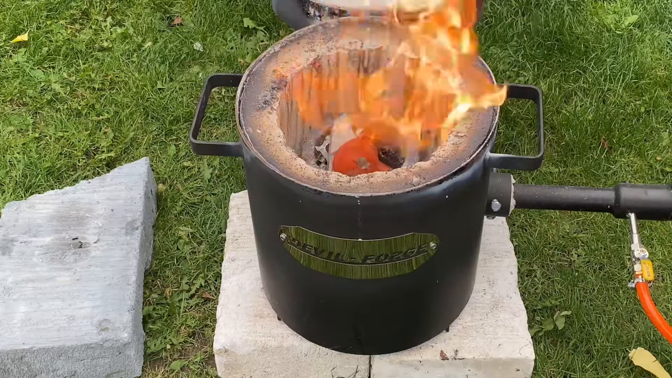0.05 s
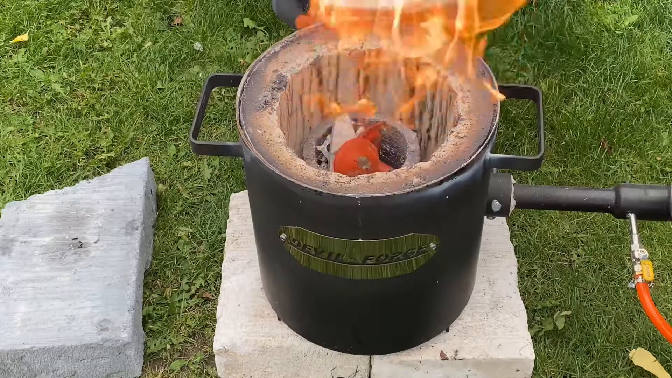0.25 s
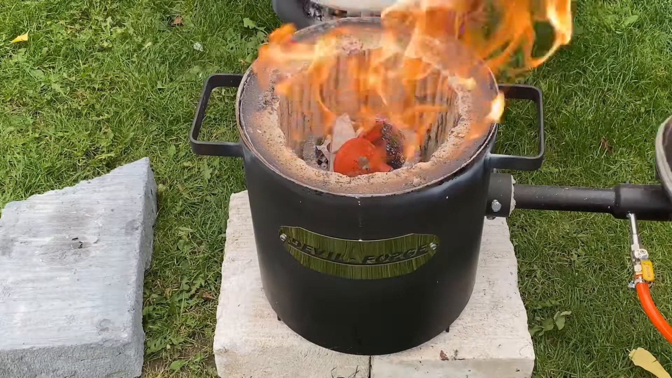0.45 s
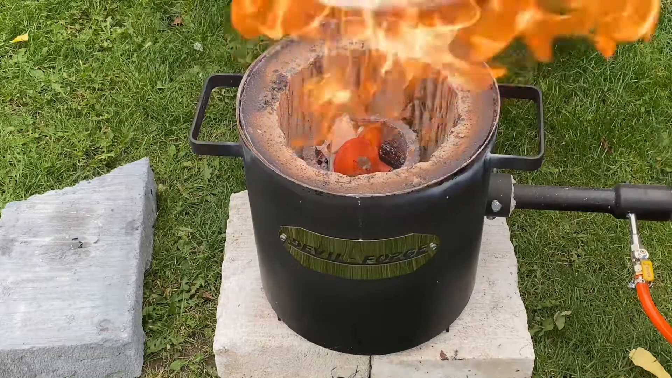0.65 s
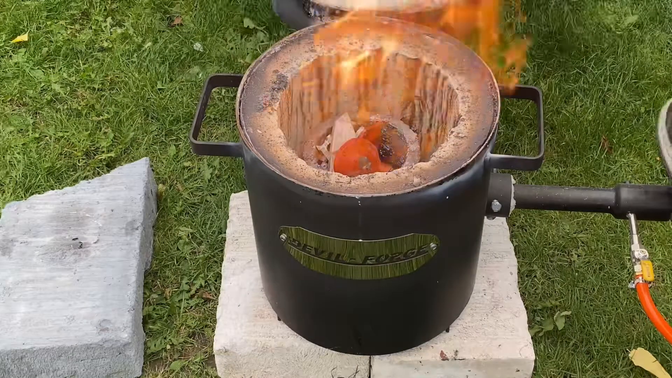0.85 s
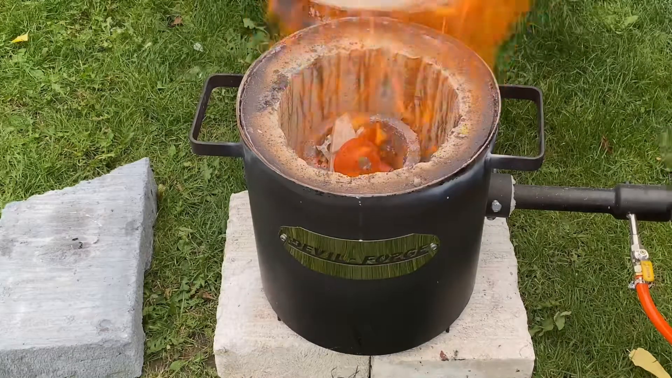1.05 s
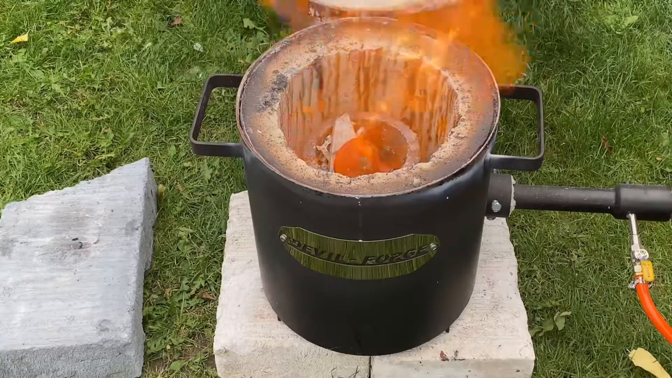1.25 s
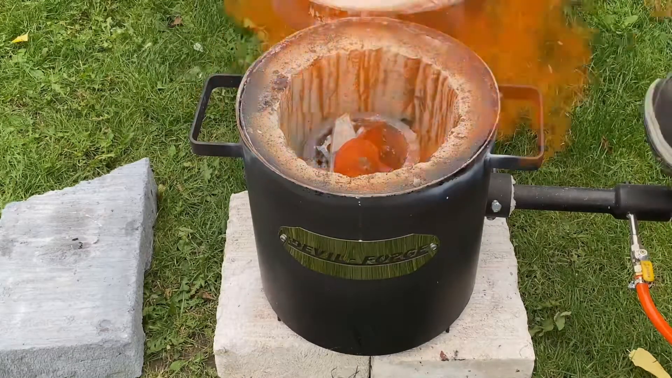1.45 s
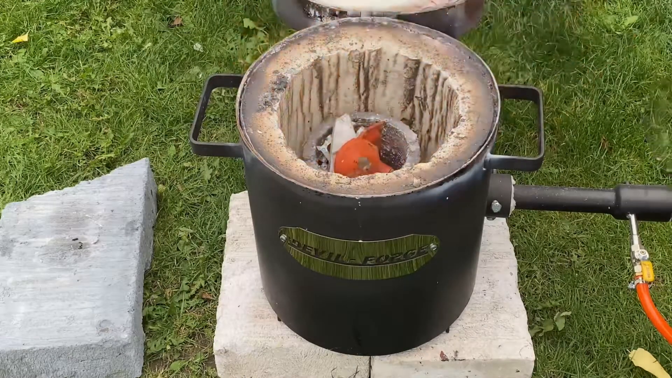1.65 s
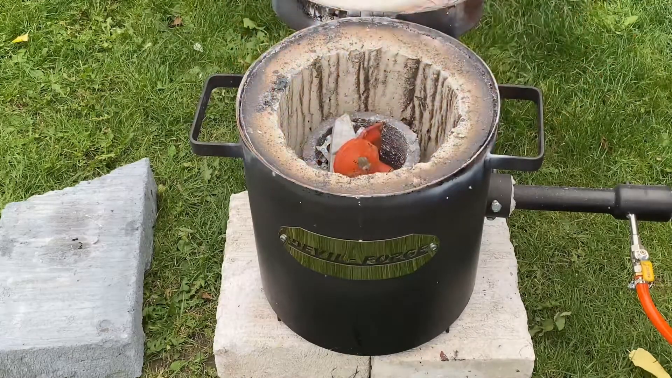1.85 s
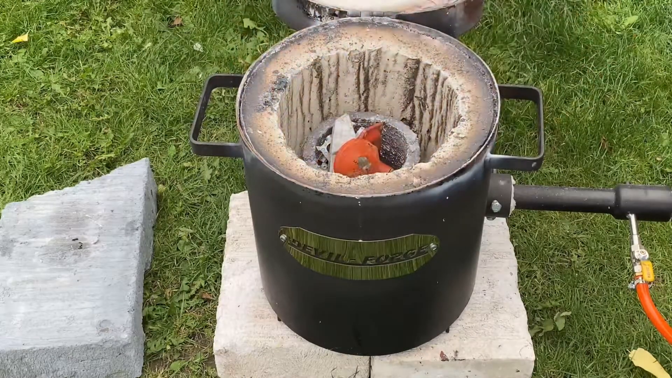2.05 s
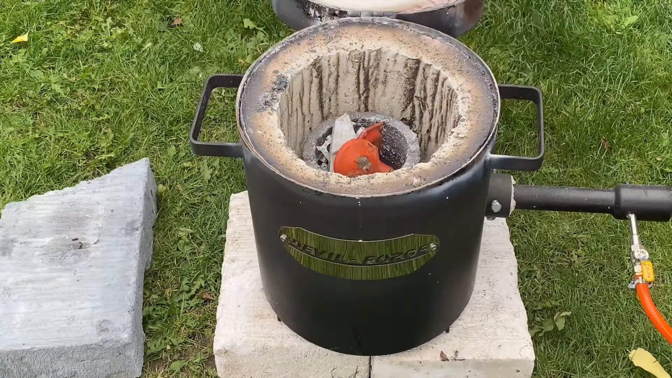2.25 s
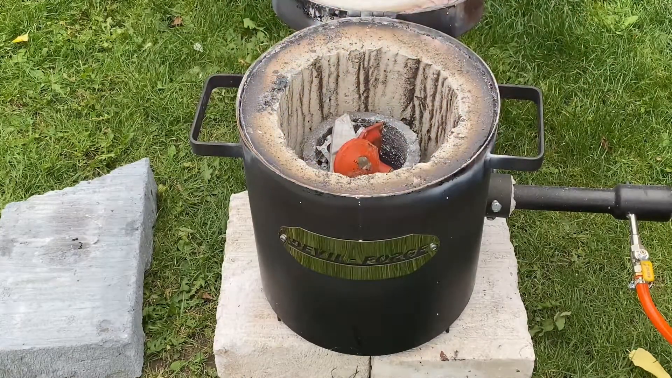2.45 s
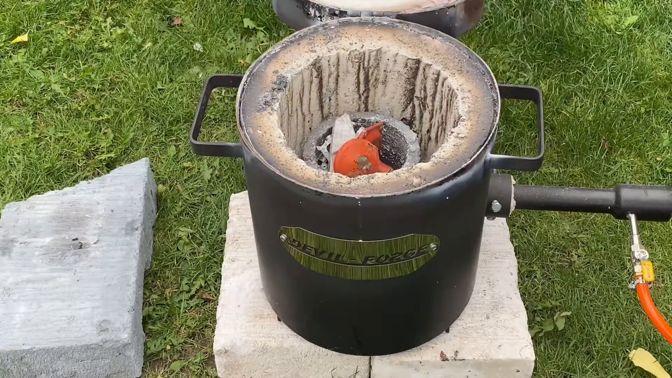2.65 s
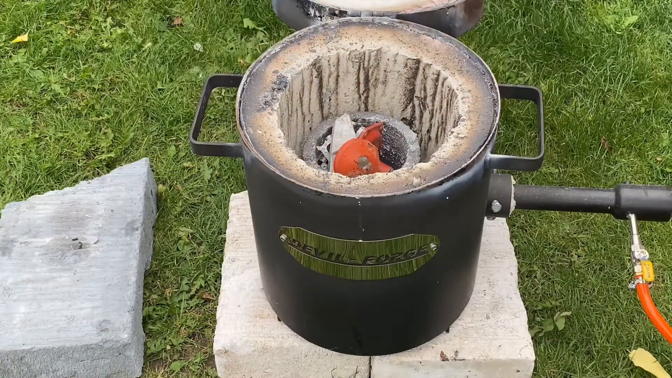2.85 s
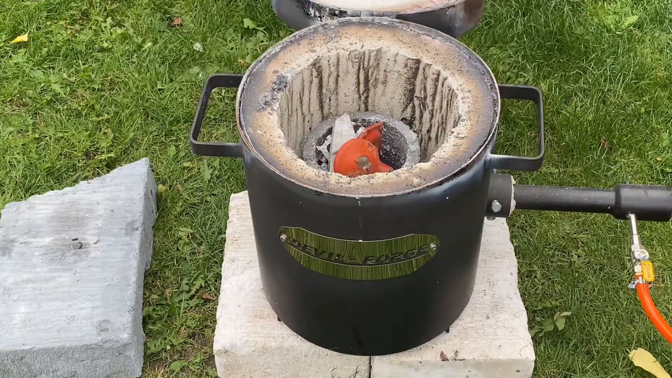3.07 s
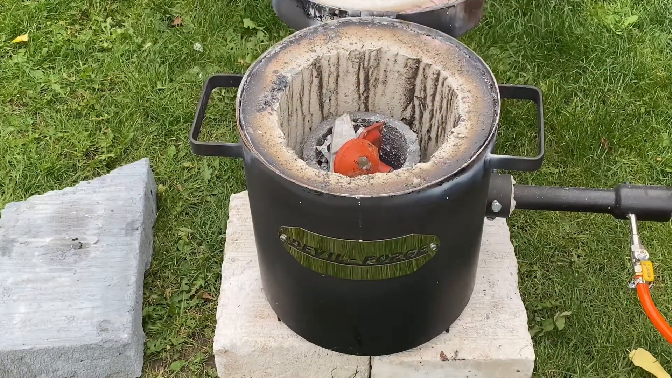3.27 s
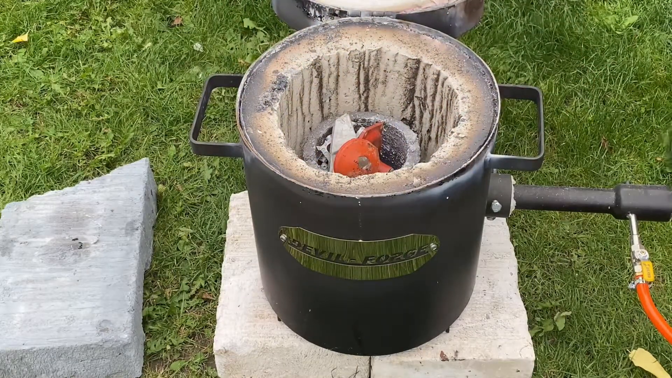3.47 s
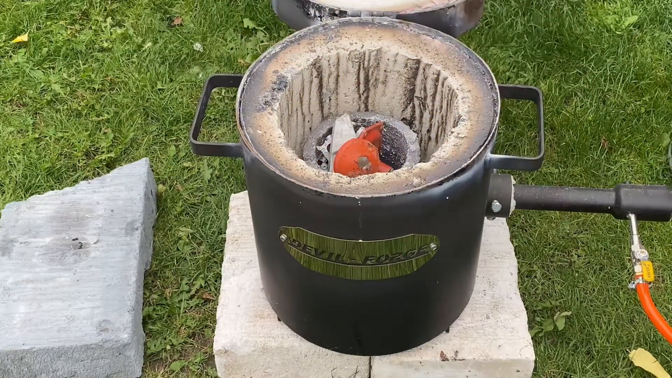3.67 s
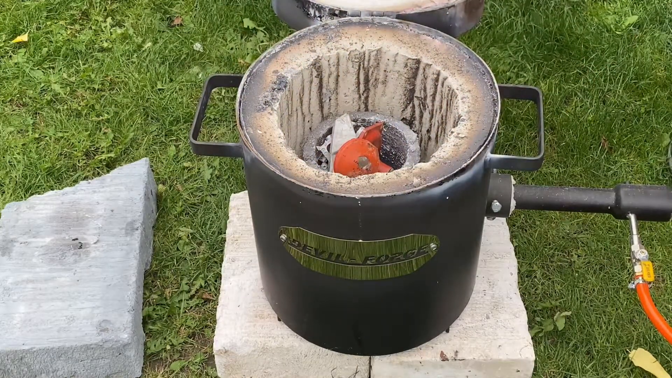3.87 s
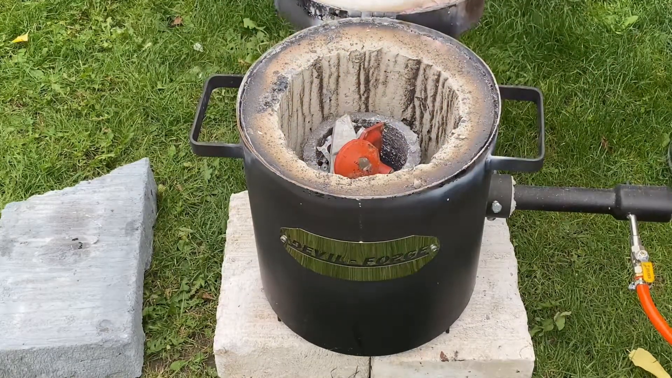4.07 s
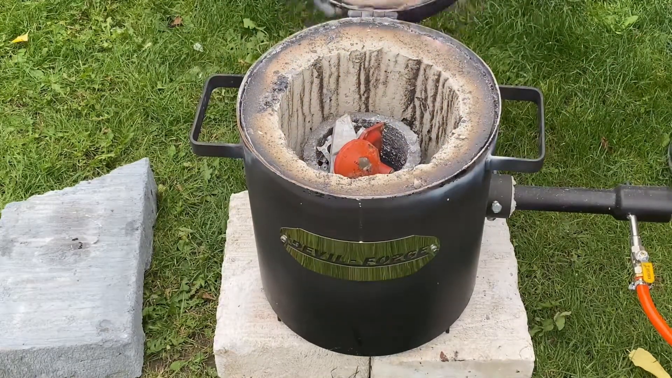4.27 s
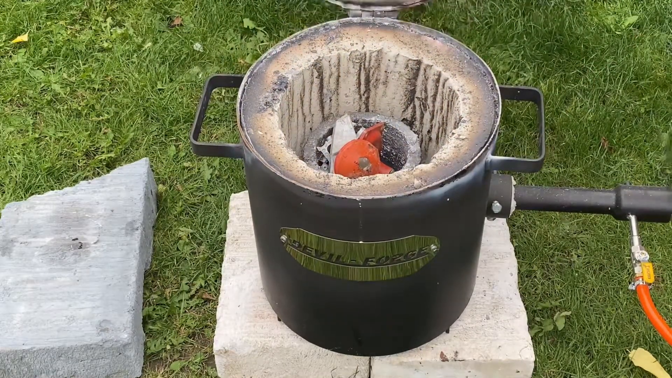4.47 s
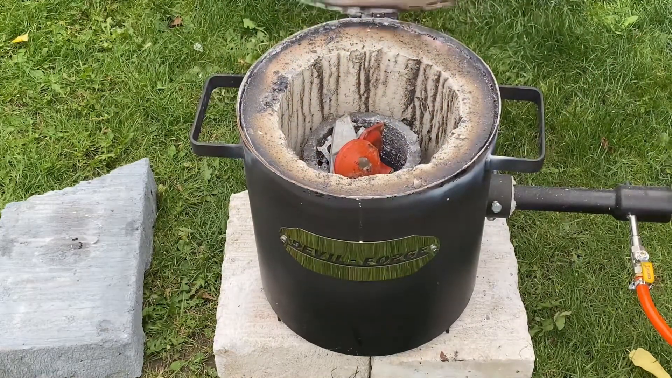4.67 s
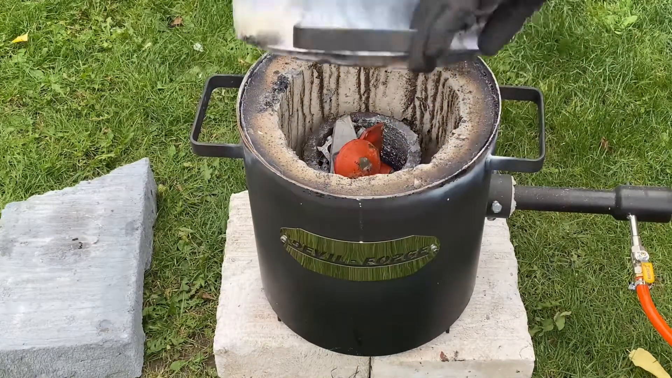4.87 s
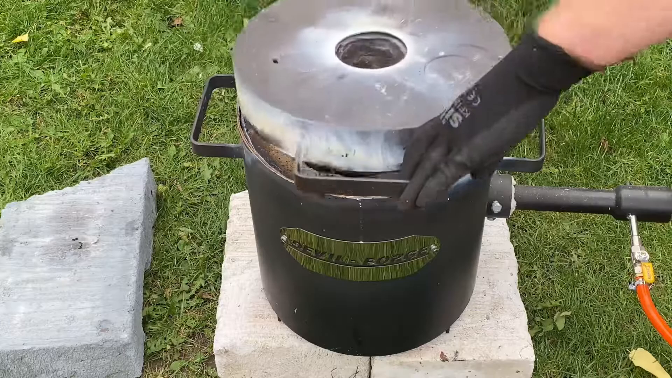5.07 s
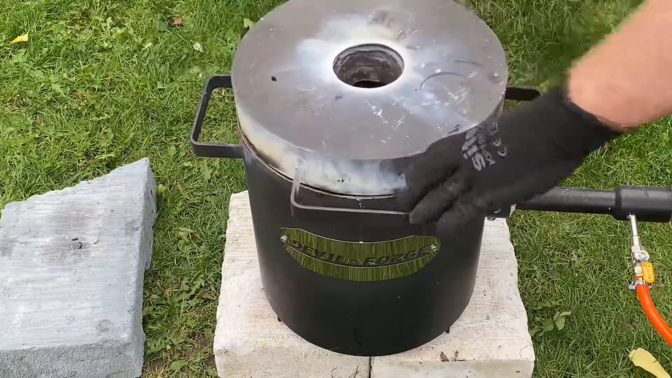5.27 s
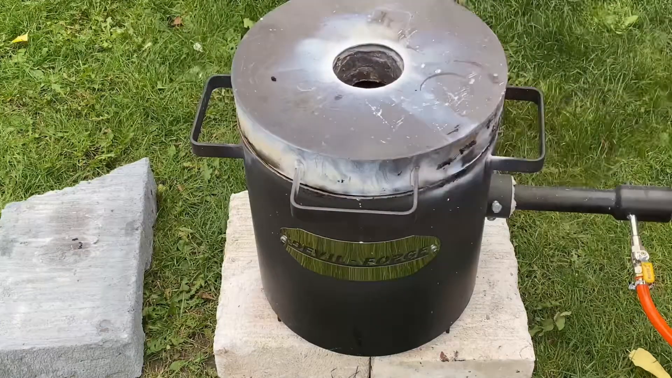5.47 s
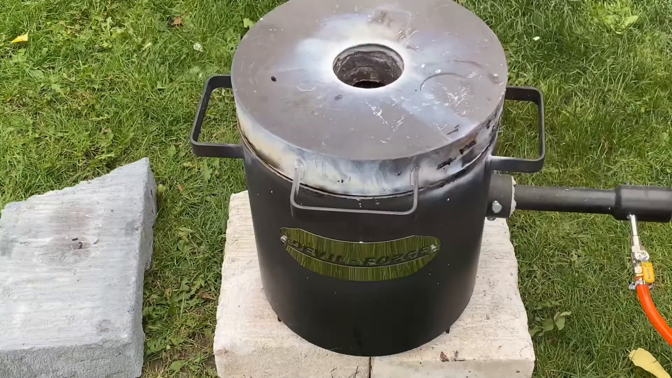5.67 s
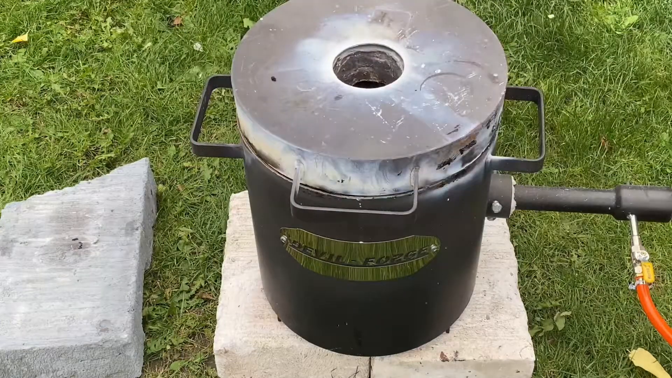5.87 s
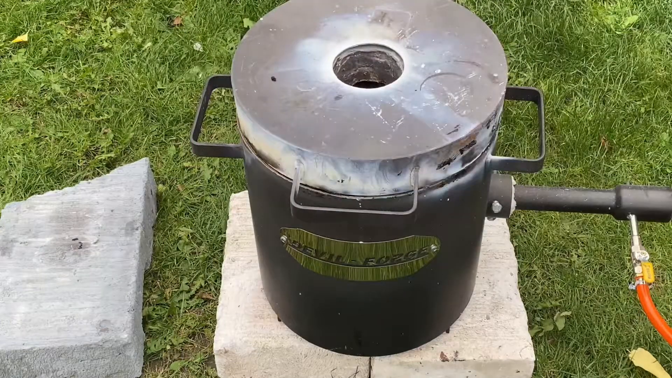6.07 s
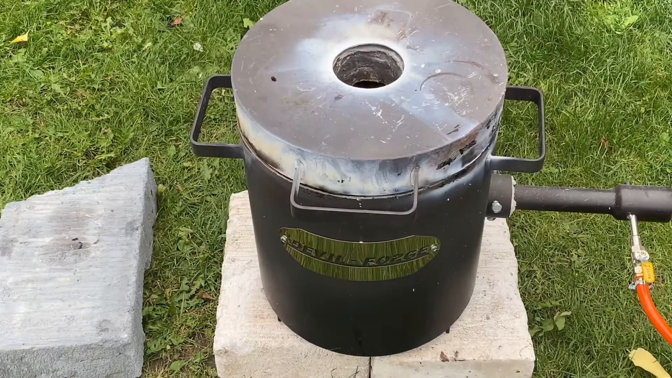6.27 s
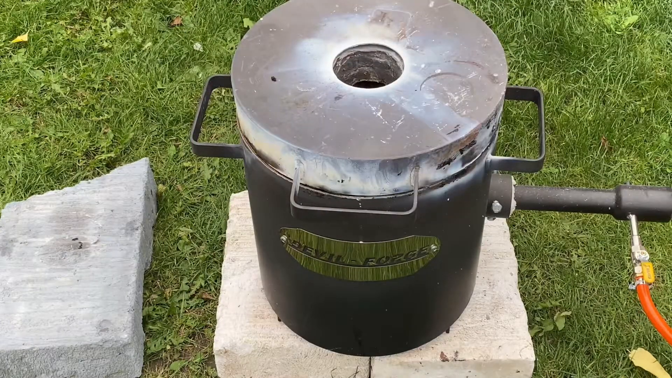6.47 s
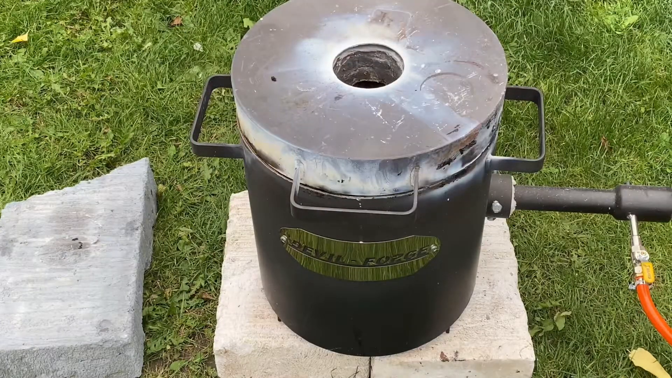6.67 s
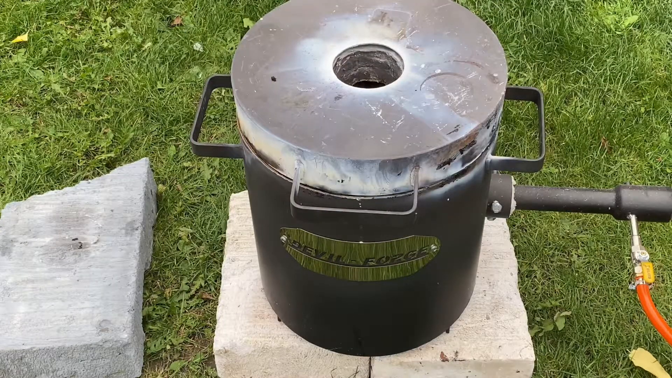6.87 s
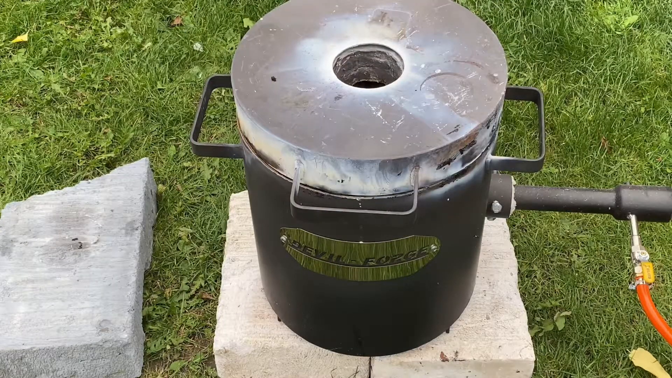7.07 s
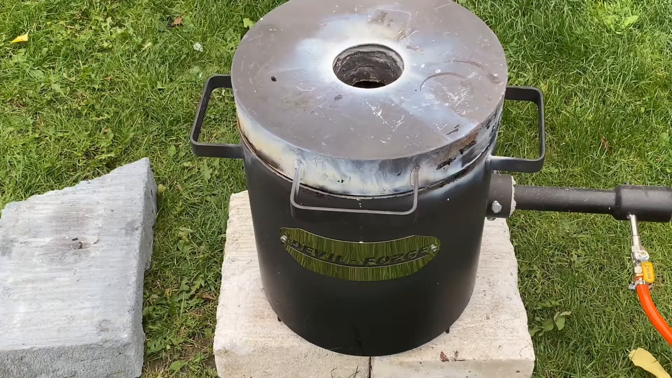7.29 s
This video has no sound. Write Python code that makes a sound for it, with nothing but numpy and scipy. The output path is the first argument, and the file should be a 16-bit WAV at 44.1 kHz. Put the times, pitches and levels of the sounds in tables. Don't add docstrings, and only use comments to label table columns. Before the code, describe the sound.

In an open garden, close to a small gas furnace, the first second is quiet: a thin high gas hiss and soft airy hush. A dull knock and faint gritty metal scrape come at 0 s, harder scraping with small clicks around 0.5-0.75 s, and lighter scrapes, ticks and low thuds at 1.0-1.25 s. Weak low flame puffs lap underneath, and the hiss opens slightly after 0.5 s. At about 1.35 s the gas ignites with a deep, sudden whoomp, dips for an instant, then becomes a loud steady roar, low and hollow with a fluttering, breathy upper edge, swelling gently near 2.2 and 4.2 s. Around 5.0-5.15 s a lid touches lightly, then lands with a sharp steel clank at 5.2 s and rattles until 5.33 s. The roar darkens, becoming boxed-in and duller. Tiny glove brushes at 5.45-5.7 s are almost buried; the muffled roar continues steadily until about 7.4 s.

```python
import sys
import numpy as np
from scipy import signal
from scipy.fft import rfft, irfft, next_fast_len
from scipy.io import wavfile
from scipy.ndimage import uniform_filter1d

SR = 44100
rng = np.random.default_rng(int(sys.argv[2]) if len(sys.argv) > 2 else 0)


def ratio(d):
    e = np.asarray(d, float) / 20
    return 10 ** e


def waveform_to_disk(signal):
    frames = np.transpose(np.atleast_2d(signal))
    scaled = np.clip(frames, -1, 1) * 32767
    samples = np.round(scaled).astype(np.int16)
    wavfile.write(sys.argv[1], SR, samples)


N = 323253
T = np.arange(N) / SR

# [f/Hz, level/dB per Hz]
OPEN_ROAR = [(15, -58), (25, -46), (97, 2), (146, -9), (259, -3), (329, -5.5), (482, -8), (642, -23.5),
             (777, -23.5), (1140, -31), (2220, -40.5), (3180, -43), (3750, -51), (7500, -59), (9750, -88),
             (16500, -120)]
SHUT_ROAR = [(15, -57), (25, -52), (86, -0.5), (190, -4), (265, -8), (612, -31), (690, -40), (1090, -35),
             (1250, -48.5), (2620, -48), (3180, -46), (3580, -55), (4230, -54), (7500, -62), (9750, -94),
             (16500, -120)]
# [f/Hz, width/Hz, lift/dB]; negative = echo dip
OPEN_CHAMBER = [(112, 15.7, 6), (194.6, 10.7, 7), (272.8, 72, 6.5), (654.6, 41, -9), (745, 105, 2.5),
                (1260, 150, 3.5), (1647, 290, 3)]
SHUT_CHAMBER = [(115, 22, 5.66), (188, 37, 3.4), (262, 6.7, 5.3), (1088, 42, 5.4), (1350, 24, 1.5),
                (1860, 174, 4.54), (2800, 39, 3), (4550, 70, 8.1)]
TUBE_MODES = [(1065.5, 19.5, 11), (1168, 48.6, -11), (2220, 89, 10), (3183, 212, 6), (3514, 435, -3),
              (4173, 287, 7.5), (5073, 64, 7), (5610, 150, 5), (6360, 320, 8)]
# [t/s, open share 0-1]
MOUTH_OPEN = [
    (4.6, 1.),
    (4.85, 0.75),
    (5.05, 0.71),
    (5.2, 0.16),
    (5.36, 0.1),
]
# [t/s, level/dB]
DRAUGHT = [
    (1.4, -2),
    (1.75, -1.5),
    (2.2, 2),
    (2.8, -0.5),
    (4.2, 1.5),
    (4.6, 0),
    (5.6, -1),
    (6.2, -1),
    (6.7, -1),
]
ROAR_DB, KINDLE_DB_PER_S, KINDLE_DULL_DB = -13.5, 257.5, -2
STALL_S, STALL_DB, STALL_WIDTH_S = 1.405, -7, 0.0139

# [f/Hz, level/dB per Hz]
LAZY_TONE = [(20, -12), (45, 4), (70, 3), (120, -8), (200, -11), (400, -50)]
# [t/s, level/dB]
LAPS = [(.02, -51), (.535, -45), (.74, -46), (.81, -44), (.97, -49.5), (1.045, -41.5), (1.13, -51),
        (1.27, -42.5)]
LAP_DB, LAP_RISE_S, LAP_FALL_DB_PER_S, CREEP_DB_PER_S = -55, 0.022, 152.5, 152.5

# [f/Hz, level/dB, t60/s, rise/s]
CATCH_MODES = [(254.5, 0, 0.15, 0.018), (408, -2, 0.065, 0.011), (550, -13, 0.079, .006),
               (745, -13.5, 0.079, .008), (1144, -18, 0.056, 0.0089), (1504, -18, 0.07, 0.015),
               (2060, -39, 0.052, .006), (3060, -36, 0.069, 0.0072), (4000, -39, 0.055, .006)]
# [f/Hz, t/s, peak level/dB, t60/s]
SURGE = [
    (81.5, 1.362, 3.5, 0.14),
    (92.3, 1.3, -24, 0.35),
]
CATCH_S, CATCH_DB, SPLASH_DB = 1.354, -1, -25.5

# [t/s, peak level/dB, brightness/dB per octave]
KNOCKS = [(4.982, -37, 6), (5.134, -29.5, -4), (5.197, -6.5, 0), (5.202, -14.5, 2), (5.212, -18, -7.5),
          (5.219, -24, 2.5), (5.229, -25.5, 3), (5.235, -18.5, -5.5), (5.245, -27, -4), (5.253, -31, -5),
          (5.268, -22, -5), (5.296, -18.5, -4), (5.305, -31, 6.5), (5.325, -30, -7)]
# [f/Hz, level/dB per Hz]
KNOCK_TONE = [(410, -40), (700, -13.5), (1880, -2), (2560, -9.5), (3350, -9.5), (4600, -7.5), (6800, -8.5),
              (8900, -16.5), (11900, -22), (13000, -48)]
# [f/Hz, width/Hz, lift/dB]
SHELL = [(887, 155, 15), (1500, 220, 4), (2030, 430, 5), (3020, 370, 3), (3320, 250, 7), (3910, 250, 2.5),
         (5750, 330, 2.5), (6390, 600, 5)]
# [f/Hz, level/dB, t60/s]
STEEL = [(905, -2, 0.32), (1990, -16, 0.51), (2190, -13.5, 0.13), (3040, -24.5, 1.2), (3500, -7, 0.19),
         (3725, -6.5, .09), (3900, -13.5, 0.071), (4360, -14, .2), (4700, -15, .2), (5749, -10, .2),
         (4540, -14.5, 0.031), (5240, -33, 0.23), (5560, -34, 0.42), (5990, -18.5, 0.21)]
# [t/s, peak level/dB, centre f/Hz, length/s]
BRUSH = [
    (5.465, -38, 10300, 0.0215),
    (5.517, -33.5, 7000, 0.0198),
    (5.632, -36, 10000, .02),
    (5.683, -28, 11000, 0.0203),
    (5.691, -30.5, 7000, .02),
]
RATTLE_T60_S, RATTLE_LOSS_S_PER_DB = 0.071, 0.0088

# [start t/s, length/s, peak level/dB, place of peak 0-1]
STROKES = [
    (0, 0.16, -39, 0),
    (.525, .14, -34, 0.61),
    (0.661, 0.099, -37, 0.48),
    (1.025, 0.17, -44, 0),
    (1.17, 0.099, -50, 0.7),
]
# [f/Hz, level/dB per Hz]
SCRAPE_TONE = [(500, -33), (800, -9), (1200, -10.5), (2200, -7.5), (3300, -17.5), (4300, -15),
               (5300, -19.5), (6300, -11.5), (7000, -25), (8000, -25), (11000, -45)]
SHAKE_TONE = [(100, -44), (170, 1), (370, -5.5), (600, -5.5), (1000, -36)]
# [f/Hz, width/Hz, lift/dB]
SLEEVE_MODES = [(1024, 100, 14.5), (1630, 90, 13.5), (1990, 170, 12.5), (2400, 73, 15), (2793, 140, 14),
                (3460, 120, 13), (4810, 31, 19.5), (5500, 96, 13.5)]
# [t/s, peak level/dB, centre f/Hz, t60/s]
TICKS = [(.173, -43, 3200, .03), (.477, -36.5, 6000, 0.042), (0.504, -24.5, 2200, 0.0394),
         (0.535, -31, 2300, 0.023), (1.027, -26, 2400, 0.047), (1.029, -39, 3800, 0.036),
         (1.031, -32.5, 970, 0.095), (1.183, -35.5, 2400, .03), (1.222, -33, 2140, .04)]
# [t/s, peak level/dB, f/Hz, t60/s]
THUDS = [(0, -17.5, 266.4, 0.081), (.004, -23, 335, 0.096), (0.53, -31.5, 112, 0.13), (.55, -34, 265, 0.11),
         (.79, -46.5, 520, .05), (1.046, -28, 114, .12), (1.074, -29, 272, 0.16)]
STROKE_SAG_DB, LIFT_OFF_S = -12, 0.0156
RASP_HZ, RASP_FROM_DB = 3960, -36

# [f/Hz, level/dB per Hz]
HISS_TONE = [(5000, -34), (7000, -5.5), (8500, 3), (10000, -1.5), (11000, 1), (12200, -2), (13500, -2),
             (14600, -9.5), (15600, -7), (15900, -40)]
# [f/Hz, width/Hz, lift/dB]
ORIFICE = [(7900, 150, 1.5), (10000, 200, 4), (11480, 200, 6), (13400, 250, 2)]
WHISTLE = [(10935, 30, 11)]
HISS_DB, CHOKED_DB, OPENED_S, OPENING_S = -53.5, -4.5, 0.53, .03

# [f/Hz, level/dB per Hz]
GARDEN_TONE = [(88, -47), (150, -4.5), (990, -5.5), (3000, -11.5), (3310, -8), (4260, -16), (5490, -7.5),
               (5930, -9), (9650, -39), (10800, 0.5), (12400, -30.5), (13200, -40), (14200, -5.5),
               (15700, -12)]
# [f/Hz, width/Hz, lift/dB]
PILOT = [(1040, 48, 7.4), (3200, 135, 2.8), (4550, 138, 9.9), (5630, 120, 5.5), (10100, 250, 2.5),
         (14650, 200, 4.6)]
HUSH_DB, DUCK_DB = -50.5, -2

# [f/Hz, phase/rad]
RIM = [(2400, 0), (3000, 0.057), (4200, 0.29), (5200, 0.13)], [(2400, 0), (3000, 0.71), (4200, .45),
       (5200, 0.073)]
LID_PORTS = [(2400, 0), (5600, 0)], [(2500, 0), (3900, 0.41), (5000, .35), (5800, 0)]
# [f/Hz, level/dB]
BALANCE_DB = [(30, 1.5), (120, 0.53), (400, -2.5), (730, -5.5), (900, -4), (1120, -6), (1350, -1),
              (1800, 1.5), (7400, 1), (7800, -0.5), (8200, 1)]
# [f/Hz, phase/rad]
LEAD = [(30, 0), (300, -.25), (1100, -.15), (1500, 0), (7500, 0), (7750, -.3), (8050, 2.1), (8600, 2.4),
        (10450, 0), (11500, 0), (12200, -1.3), (12500, -np.pi), (13800, -np.pi), (15250, -2 * np.pi)]
SCATTER_DB, SCATTER_HZ, SCATTER_T60_S = -25, 900, 0.054
RUMBLE_CUT_HZ, TOP_CUT_HZ = 34, 15800


def roar():
    mouth = np.clip(np.interp(T, *np.transpose(MOUTH_OPEN)), 0, 1)
    opened = ports(noise(OPEN_ROAR, OPEN_CHAMBER + TUBE_MODES, patchy_db=1.0), *RIM)
    shut = noise(SHUT_ROAR, SHUT_CHAMBER + TUBE_MODES, patchy_db=0.8)
    body = mouth * opened + np.sqrt(1 - mouth ** 2) * shut

    bright = signal.filtfilt(*signal.butter(2, 800, "high", fs=SR), body)
    eddies = flicker(depth_db=1.5, hz=18.0) * flicker(depth_db=1.0, hz=149)
    draught = ratio(np.interp(T, *np.transpose(DRAUGHT)) + KINDLE_DULL_DB * (T < STALL_S))
    body = body + bright * (eddies * draught - 1)

    early = np.maximum(STALL_S - STALL_WIDTH_S - T, 0)
    stall = STALL_DB * np.exp(-((T - STALL_S) / STALL_WIDTH_S) ** 2)
    burning = ratio(ROAR_DB - KINDLE_DB_PER_S * early + stall)
    return body * flicker(depth_db=.5, hz=31.2) * burning


def lazy_flame():
    laps = 0
    for s, db in LAPS:
        fall = ratio(db - LAP_FALL_DB_PER_S * np.maximum(T - s, 0))
        laps = laps + fall * step(s - LAP_RISE_S, LAP_RISE_S / 2)
    creep = ratio(-20.5 - CREEP_DB_PER_S * np.maximum(CATCH_S - T, 0))
    level = (ratio(LAP_DB) + laps + creep) * (1 - step(CATCH_S, .004))
    return noise(LAZY_TONE, [], patchy_db=1.5) * level


def catch():
    t = np.arange(9000) / SR
    out = np.zeros(N)
    for hz, db, t60, rise in CATCH_MODES:
        swell = ratio(db - 60 * t / t60) * np.sin(np.pi / 2 * np.minimum(t / rise, 1)) ** 2
        add(out, CATCH_S, ratio(CATCH_DB) * swell * np.sin(2 * np.pi * hz * t))
        add(out, CATCH_S, ratio(CATCH_DB + db + 3.0) * burst(hz, 0.2 * hz, t60, rise))
    for hz, s, db, t60 in SURGE:
        heave = ratio(db - 60 * t / t60) * np.sin(2 * np.pi * hz * t)
        add(out, s, heave * np.minimum(t / 0.011, 1))
    add(out, CATCH_S, ratio(SPLASH_DB) * burst(2000, 3000, 0.17, rise=0.0113))
    return out


def lid():
    t, hz = np.arange(8192) / SR, np.fft.rfftfreq(8192, 1 / SR)
    out = np.zeros(N)
    for s, db, tilt_db in KNOCKS:
        t60 = RATTLE_T60_S - RATTLE_LOSS_S_PER_DB * tilt_db
        tilt = tilt_db * np.log2((hz + 1) / 3000)
        tone = ratio(read(KNOCK_TONE, hz) + lift(SHELL, hz) + tilt)
        crack = evened(irfft(rfft(rng.standard_normal(len(t))) * tone)) * ratio(-60 * t / t60)
        ring = 0
        for f, level_db, ring_t60 in STEEL:
            fade = ratio(level_db - 60 * t / min(ring_t60, .09))
            ring = ring + fade * np.sin(2 * np.pi * (f * t + rng.random()))
        add(out, s, ratio(db) * (0.37 * crack + ratio(-15.0) * ring) * np.minimum(t / 0.00215, 1))
    for s, db, hz_mid, length in BRUSH:
        add(out, s, ratio(db) * burst(hz_mid, 0.36 * hz_mid, 4 * length, rise=0.0052))
    return out


def sleeve():
    grit = noise(SCRAPE_TONE, SLEEVE_MODES, patchy_db=.8) * flicker(depth_db=1.8, hz=220)
    grit = grit + ratio(-6.0) * noise(SHAKE_TONE, [(173, 16, 9.4), (362, 30, 12)], patchy_db=0.0)
    pressure = sum(stroke(*row) for row in STROKES)
    rasp = signal.lfilter(*signal.butter(2, RASP_HZ, "high", fs=SR), grit)
    out = pressure * (grit + rasp * (pressure / ratio(RASP_FROM_DB) - .4))
    for s, db, hz, t60 in TICKS:
        add(out, s, ratio(db) * burst(hz, 0.51 * hz, t60, rise=0.00082))
    t = np.arange(4096) / SR
    for s, db, hz, t60 in THUDS:
        ring = ratio(-60 * t / t60) * np.sin(2 * np.pi * hz * t) * np.minimum(t / 0.0018, 1)
        add(out, s, ratio(db) * (ring + 1.05 * burst(hz, .5 * hz, t60, rise=0.0087)))
    return out


def stroke(start, length, db, peak):
    u = (T - start) / length
    sag = np.interp(u, [0, np.clip(peak, .01, .99), 1], [1, 0, 1])
    return ratio(db + STROKE_SAG_DB * sag) * (u >= 0) * (1 - step(start + length, LIFT_OFF_S))


def jet():
    hiss = noise(HISS_TONE, ORIFICE + WHISTLE, patchy_db=1.7) * flicker(depth_db=1.6, hz=25)
    return hiss * ratio(HISS_DB + CHOKED_DB * (1 - step(OPENED_S, OPENING_S)))


def garden():
    hush = noise(GARDEN_TONE, PILOT, patchy_db=1.8)
    return hush * ratio(HUSH_DB + DUCK_DB * step(CATCH_S, 0.028))


def scatter(x):
    t = np.arange(4096) / SR
    echoes = rng.standard_normal(4096) * ratio(-60 * t / SCATTER_T60_S)
    taps = signal.lfilter(*signal.butter(3, SCATTER_HZ, fs=SR), echoes)
    flat = taps / np.linalg.norm(taps) * np.sqrt(2 * SCATTER_HZ / SR)
    blur = signal.oaconvolve(x.mean(0), flat)[:N]
    return ratio(SCATTER_DB) * blur * np.array([[1], [-1]])


def ports(x, balance_db, lead):
    size = next_fast_len(N + 4096)
    hz = np.fft.rfftfreq(size, 1 / SR)
    port = ratio(read(balance_db, hz) / 2) * np.exp(.5j * read(lead, hz))
    return irfft(rfft(x, size) * np.array([port, 1 / port]), size)[:, :N]


def noise(tone, modes, patchy_db):
    hz = np.fft.rfftfreq(2048, 1 / SR)
    a, b, patches = rng.standard_normal((N // 512 + 5, 1025, 3)).T
    patches = uniform_filter1d(patches, size=16, axis=0)
    patches = evened(uniform_filter1d(patches, size=6, axis=1))
    colour_db = (read(tone, hz) + lift(modes, hz))[:, None]
    z = (a + 1j * b) * ratio(colour_db + patchy_db * patches)
    return evened(signal.istft(z, nperseg=2048, noverlap=1536)[1][:N])


def flicker(depth_db, hz):
    pole = np.exp(-2 * np.pi * hz / SR)
    slow = signal.lfilter([1], [1, -pole], rng.standard_normal(N))
    slow = signal.lfilter([1], [1, -pole], slow)
    return evened(ratio(depth_db * evened(slow)))


def burst(hz, width, t60, rise):
    t = np.arange(4096) / SR
    band = np.exp(-((np.fft.rfftfreq(4096, 1 / SR) - hz) / width) ** 2)
    puff = evened(irfft(rfft(rng.standard_normal(len(t))) * band))
    return .5 * puff * ratio(-60 * t / t60) * np.minimum(t / rise, 1)


def step(s, width):
    return .5 + .5 * np.tanh((T - s) / width)


def evened(x):
    return x / np.sqrt(np.mean(x ** 2) + 1e-20)


def read(points, hz):
    f, value = np.transpose(points)
    return np.interp(np.log(hz + 1), np.log(f + 1), value)


def lift(modes, hz):
    return sum(db / (1 + (2 * (hz - f) / width) ** 2) for f, width, db in modes)


def add(mix, s, sound):
    part = mix[..., round(s * SR):][..., :sound.shape[-1]]
    part += sound[..., :part.shape[-1]]


def scene():
    above_rim = catch() + sleeve() + jet() + garden() + ports(lid(), *LID_PORTS)
    near = roar() + lazy_flame() + ports(above_rim, *RIM)
    return near + scatter(near)


def band_limit(x):
    return signal.sosfilt(signal.butter(12, 16920, fs=SR, output="sos"), x)


def record(dry):
    cut = signal.lfilter(*signal.butter(2, RUMBLE_CUT_HZ, "high", fs=SR), dry)
    pair = np.tanh(ratio(0.13) * ports(cut, BALANCE_DB, LEAD))
    top = signal.firwin(801, TOP_CUT_HZ, window=("kaiser", 10), fs=SR)
    return band_limit(signal.oaconvolve(pair, top[None], "same"))


dry = scene()
out = record(dry)
waveform_to_disk(out)
```